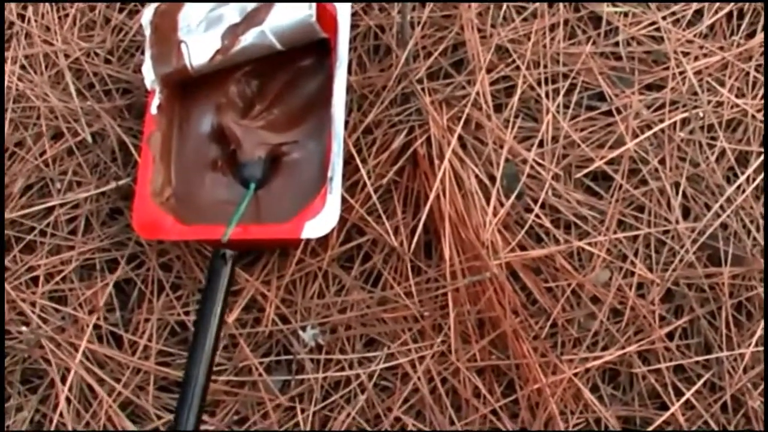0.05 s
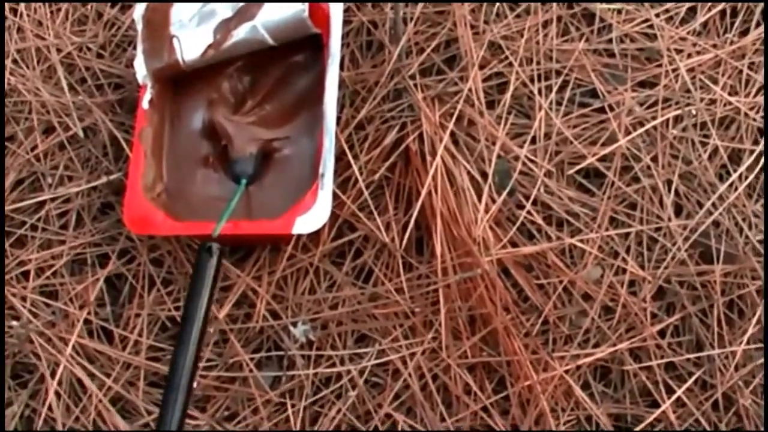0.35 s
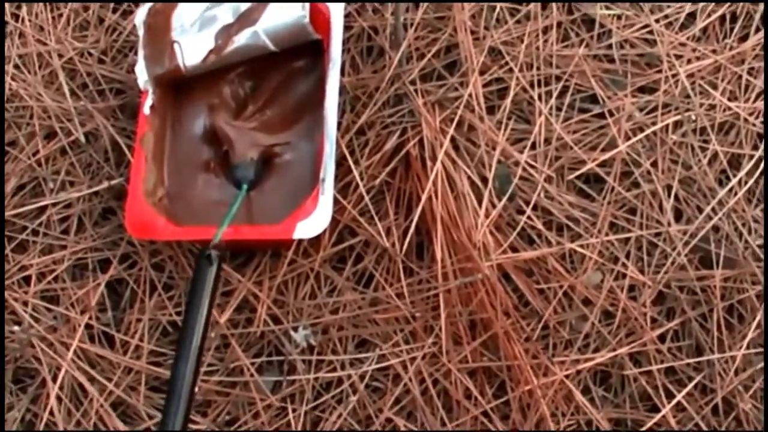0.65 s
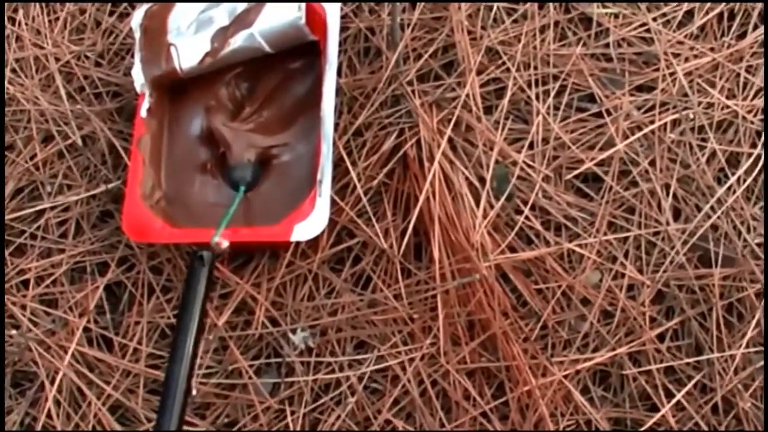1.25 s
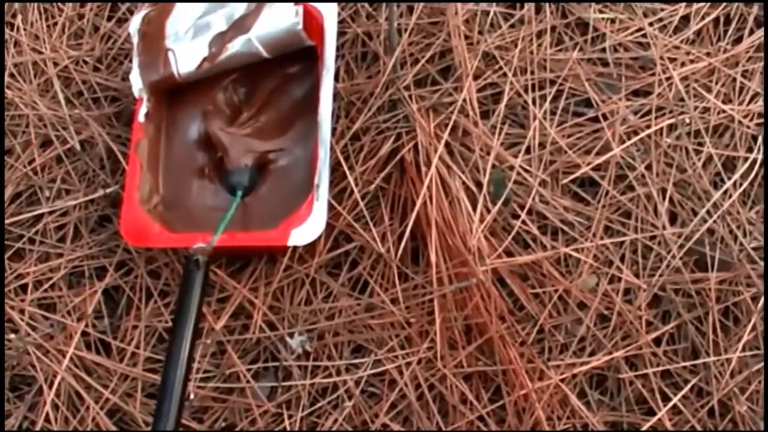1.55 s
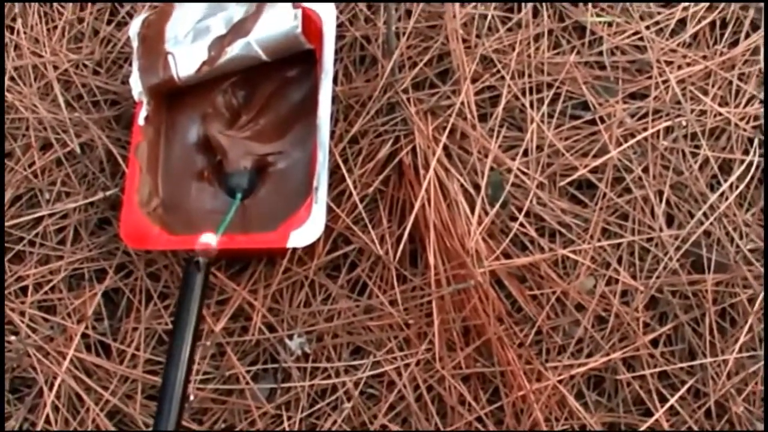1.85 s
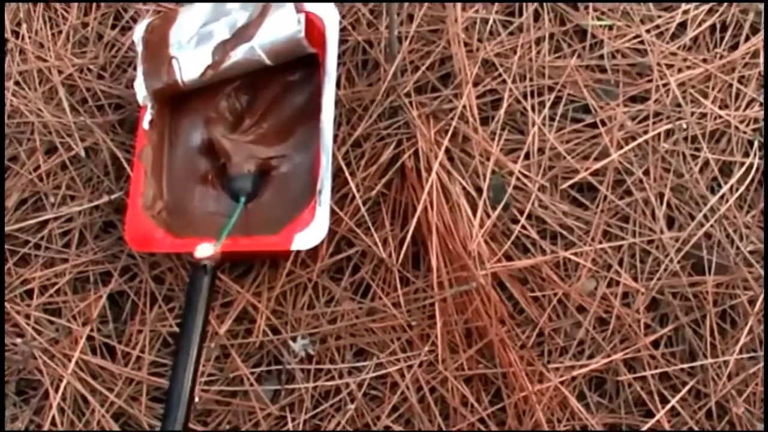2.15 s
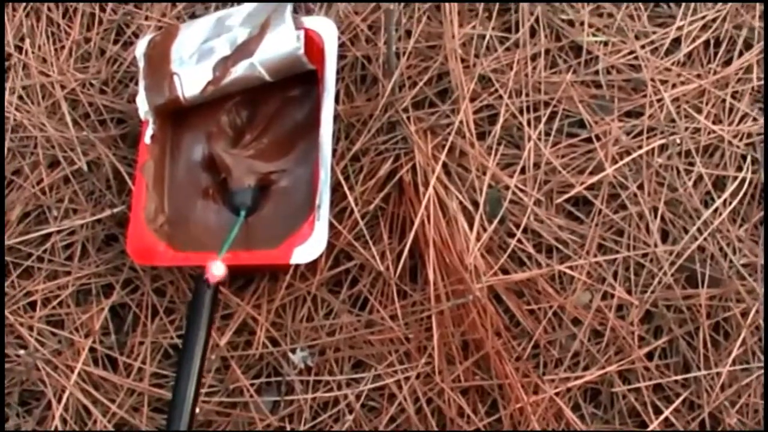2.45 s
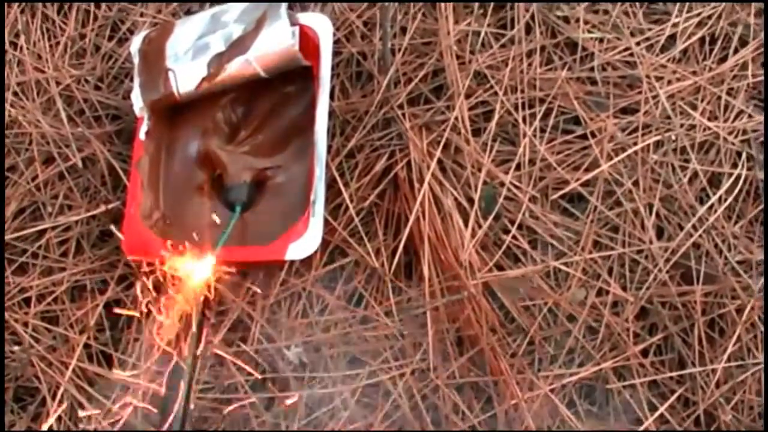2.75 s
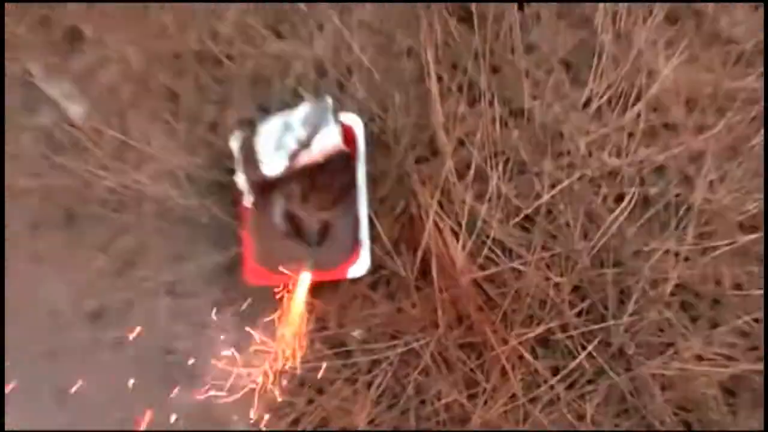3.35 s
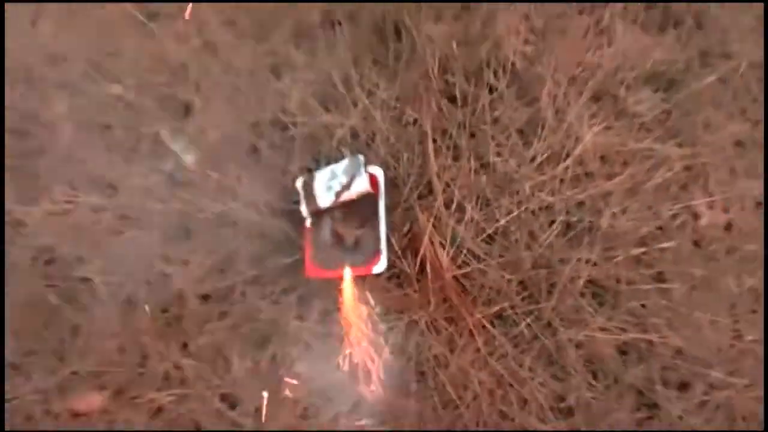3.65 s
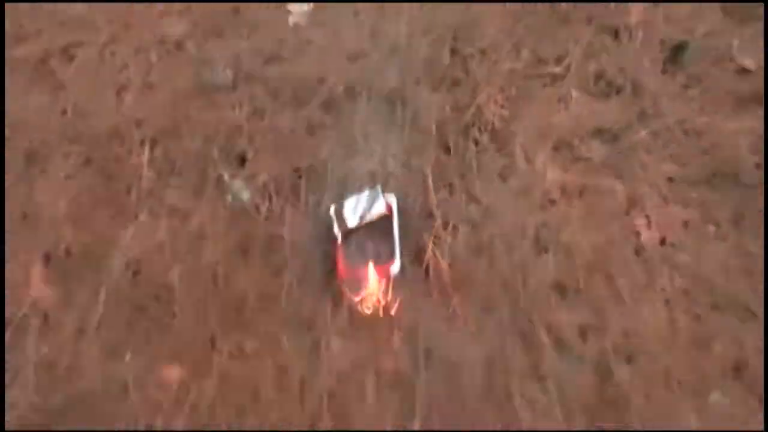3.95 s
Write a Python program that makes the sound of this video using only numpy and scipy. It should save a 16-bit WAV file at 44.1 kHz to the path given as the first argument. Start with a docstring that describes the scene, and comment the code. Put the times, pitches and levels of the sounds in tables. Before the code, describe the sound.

A firecracker fuse is lit outdoors over a low rumble. A lighter clicks three times in the first 0.7 seconds, the second click softer. Faint powder spits follow from 0.9 seconds, growing denser. At 2.7 seconds the fuse flares into a bright, crackling hiss, with a few sharp pops near 2.9. The hiss gradually weakens as the microphone backs away, and wind buffets it lightly near 4 seconds.

```python
"""Outdoors, on the ground: a long gas lighter is clicked three times and held to a firecracker fuse.
Each snap of the igniter's hammer knocks the case and rings a spring. Powder grains spit in the flame;
the fuse flares, then burns as a hissing gas jet full of sparks, fading as the microphone backs away.
Air buffets the moving microphone. A low rumble and a wash of open air lie under everything."""
import sys
import numpy as np
from scipy import signal
from scipy.fft import rfft, irfft
from scipy.io import wavfile
from scipy.ndimage import map_coordinates

SR = 44100
rng = np.random.default_rng(int(sys.argv[2]) if len(sys.argv) > 2 else 0)


def wav_out(sig):
    """Save sig, one row per channel (or a flat mono array), as 16-bit PCM at SR to the path in sys.argv[1]."""
    wavfile.write(sys.argv[1], SR, np.round(np.clip(np.atleast_2d(sig).T, -1, 1) * 32767).astype(np.int16))


N = 176400  # 4 s

# burn strength (time [s], level [dB])
JET_LEVEL = [(2.66, -70), (2.70, -37.5), (2.77, -31), (2.82, -29.5), (2.89, -28.5), (3.04, -29),
             (3.09, -29), (3.204, -28.5), (3.218, -31.5), (3.29, -31.3), (3.41, -33), (3.46, -31.5),
             (3.495, -35.3), (3.70, -36), (3.79, -38.5), (3.84, -35.5), (3.92, -39), (4.0, -38.5)]
# larger sparks (time [s], level [dB], t60 [s])
SPARK_POPS = [(2.8915, -27, .006), (2.9445, -22, .008), (2.9575, -16, .006)]
# single powder grains (time [s], level re SPIT_DB [dB], t60 [s])
GRAIN_SPITS = [(0.8824, -29.5, 0.0025), (1.2115, -47, 0.026), (1.2873, -48.5, 0.0058), (1.5135, -42, .02),
               (1.5232, -40.5, 0.0097), (1.5788, -59, .004), (1.8635, -38.5, 0.048), (1.8755, -39.5, 0.023),
               (1.8870, -40, 0.0076), (2.0077, -46.5, 0.011), (2.0308, -51, .006), (2.0442, -52, .006),
               (2.0655, -46.5, 0.0091), (2.1728, -40.5, 0.011), (2.2300, -48, .005), (2.3966, -37, 0.013),
               (2.4015, -35.5, 0.016), (2.4085, -36, 0.0074), (2.4591, -38, .006), (2.4679, -41, 0.0045),
               (2.5023, -42, 0.0093), (2.5136, -41.5, .01), (2.5277, -42, .01), (2.5515, -39.5, .014),
               (2.5620, -38, .01), (2.5718, -36, 0.0084), (2.5822, -33, 0.014), (2.5877, -39, 0.017),
               (2.6025, -34.5, .008), (2.6105, -39, 0.0093), (2.6355, -36, 0.017), (2.6572, -43, .008),
               (2.6688, -40, .01), (2.6743, -31.5, .008)]
# fuse spectra (frequency [Hz], relative level [dB])
JET_SPECTRUM = [(500, -12.5), (900, -10.5), (1500, -4.5), (1750, -7), (1880, -15.5), (2700, -6.5),
                (3500, -2), (4700, 3.5), (5650, -4), (6400, -3), (7500, 1.5), (9600, -3.5), (11200, 0.5),
                (12500, -1), (15300, 1.5), (16000, -4)]
ROAR_SPECTRUM = [(30, -26), (150, -16), (220, -2.5), (290, 2.5), (400, -7), (580, -15), (850, -10.5),
                 (1500, -18.5), (2000, -22), (5000, -67)]
FLARE_SPECTRUM = [(300, -6), (1400, -1.5), (2000, -9.5), (2800, -1.5), (3500, 5), (4600, 1), (5400, -9),
                  (7100, 0), (8200, -8), (10000, -16), (11900, 3.5), (13500, -2.5), (15000, -1),
                  (16000, -19)]
SPIT_SPECTRUM = [(500, -31), (2000, -16.5), (3500, -0.5), (5000, -5.5), (7500, -0.5), (9700, -8),
                 (12500, 1), (16000, -1.5)]

# lighter mechanism (time [s], relative level [dB], contact offset [dB], case t60 [s])
LIGHTER_CLICKS = [(0.1357, -26.5, -1, 0.0052), (0.1515, -12.5, -4.5, .011), (0.3665, -44, -11, 0.0051),
                  (0.3970, -48, -7, .006), (0.4166, -37, -7, 0.024), (0.4348, -22, 8, .011),
                  (0.5352, -39, -8, 0.01), (0.5797, -42, -19, 0.015), (0.6020, -46.5, -18, .015),
                  (0.6920, -13.5, 0, 0.014)]
# hammer blows (time [s], thump [dB], knock [dB], spring [dB], spring [Hz], low mode re spring [dB])
HAMMER_SNAPS = [(0.1530, -23.5, -23, -50, 6051, -22), (0.4344, -42, -34, -54, 6300, 1),
                (0.6925, -25, -16.5, -45, 6051, -22)]
# lighter case and hard contact (frequency [Hz], relative level [dB])
CASE_SPECTRUM = [(60, -35), (300, -7), (700, -19), (1150, -27), (1700, -14), (3000, -13.5), (3500, -2.5),
                 (4200, -3.5), (4900, -9), (6500, -12.5), (8200, -12.5), (9500, -21), (16000, -13)]
CONTACT_SPECTRUM = [(2000, -52), (6000, -7.5), (9600, -10), (11000, 0), (13300, -1), (14500, 4),
                    (16000, -5.5)]

# reflections off the ground and a tub (delay [ms], gain [linear])
ECHO_PATHS = [(.51, 0.063), (.80, 0.089), (2.4, 0.1), (5.3, 0.11)]
# background envelopes (time [s], level [dB])
BUFFET_LEVEL = [(3.0, -100), (3.3, -73.5), (3.6, -60), (3.90, -43), (3.93, -44), (3.96, -50), (4, -39)]
RUMBLE_LEVEL = [(0, -42.5), (1.2, -40), (2.4, -38.5), (4, -38)]
AIR_LEVEL = [(0, -52.5), (1.2, -53), (2.4, -48.5), (4, -45.5)]
# background spectra (frequency [Hz], relative level [dB])
BUFFET_SPECTRUM = [(25, -3), (60, 4), (135, 9), (200, -8.5), (400, -12), (1500, -32), (5000, -69)]
RUMBLE_SPECTRUM = [(20, -44), (42, -36), (54, -14.5), (70, 0.5), (110, 0.5), (138, -13), (160, -32.5),
                   (300, -64.5)]
AIR_SPECTRUM = [(100, -14.5), (163, -6), (190, -1.5), (260, 1), (420, -3.5), (600, -12.5), (1050, -11.5),
                (1550, -17.5), (2000, -29.5), (3000, -28), (4300, -26.5), (5800, -34), (9700, -38),
                (14000, -38), (16000, -62)]
# stereo width of near and distant sound (frequency [Hz], side re mid [dB])
NEAR_SIDE = [(100, -18), (300, -38), (600, -34), (1200, -36.5), (2200, -73), (4500, -15), (9000, -14),
             (14000, -11)]
FAR_SIDE = [(45, -8), (90, -43.5), (160, -10.5), (300, -15), (600, -12), (1200, -5.5), (2400, -6),
            (5000, -2.5), (14000, -2.5)]

CATCH_S, CATCH_RISE_S = 2.694, 0.0069
SPIT_DB, SNAP_RISE_S = -4, 0.00017


def burning_fuse():
    """Burning powder drives a fluttering gas jet: hiss, sparks and a turbulent low roar."""
    jet_db = in_time(JET_LEVEL)
    sparks = from_db(-11) * spark_crackle()
    hiss_db = jet_db + 0.81 * drift(rate_hz=50)
    hiss = from_db(hiss_db) * jet_timbre(noise(JET_SPECTRUM) + sparks, jet_db)
    roar_db = -27.5 + 0.52 * jet_db + 1.5 * drift(rate_hz=22)
    roar = from_db(roar_db) * noise(ROAR_SPECTRUM)
    return ignition() * (hiss + roar) + bursts(SPARK_POPS, SPIT_SPECTRUM, SNAP_RISE_S)


def spark_crackle(rate_per_s=760, spread_db=3.5):
    """Fine sparks: random impulses, mostly small."""
    size_db = spread_db * np.minimum(rng.exponential(1, N), 5)
    impulses = from_db(size_db) * rng.choice([-1, 1], N)
    fired = rng.random(N) < rate_per_s / SR
    return colour(unit_rms(impulses * fired), JET_SPECTRUM)


def jet_timbre(x, jet_db, depth_db=1.5, width_hz=180, rate_hz=1.5, knee_hz=5030, ref_db=-31.5):
    """Resonances shift as the burning tip changes shape; a stronger jet is brighter."""
    hz, frame_s, frames = signal.stft(x, SR, nperseg=1024)
    field = rng.standard_normal((len(hz) + 100, len(frame_s) + 200))  # padded for filter settling
    field = smooth(field, pole=np.exp(-hz[1] / width_hz), axis=0)
    field = smooth(field, pole=np.exp(-2 * np.pi * rate_hz * frame_s[1]), axis=1)
    peaks_db = depth_db * unit_rms(field[-len(hz):, -len(frame_s):])
    treble_oct = np.log2(np.maximum(hz / knee_hz, 1))
    excess_db = np.interp(frame_s, seconds(), jet_db) - ref_db
    tilt_db = 0.27 * np.outer(treble_oct, excess_db)
    return signal.istft(frames * from_db(peaks_db + tilt_db), SR)[1][:, :N]


def ignition():
    """Gain rising from 0 to 1 as the powder catches."""
    return np.exp(np.minimum(seconds() - CATCH_S, 0) / CATCH_RISE_S)


def flare(peak_s=2.744, swell_s=0.027, fall_s=0.026):
    """The tip goes up in a hiss and a swelling puff; both then collapse."""
    age_s = seconds() - peak_s
    swell = np.exp(np.minimum(age_s, 0) / swell_s)
    fall = np.exp(-np.maximum(age_s, 0) / fall_s)
    hiss = from_db(-31.5) * noise(FLARE_SPECTRUM)
    puff = from_db(-30) * swell * noise(ROAR_SPECTRUM)
    return ignition() * fall * (hiss + puff)


def spitting(top_rate_per_s=130, build_s=0.17, sizzle_rel_db=-55, sizzle_t60_s=0.0066):
    """Grains go off as the fuse heats; a faint sizzle thickens until the powder catches."""
    t = seconds()
    rate_per_s = top_rate_per_s * np.exp(np.minimum(t - CATCH_S, 0) / build_s) * (t < CATCH_S)
    sizzle = [(s, sizzle_rel_db, sizzle_t60_s) for s in t[rng.random(N) < rate_per_s / SR]]
    return from_db(SPIT_DB) * bursts(list(GRAIN_SPITS) + sizzle, SPIT_SPECTRUM, rise_s=0.00069)


def lighter(case_db=-5.5, contact_db=-4.5, rattle_t60_s=0.042):
    """Hard contacts rattle the case; the hammer adds a thump, a knock, spring ring and bright rattle."""
    case = [(s, db + case_db, t60_s) for s, db, _, t60_s in LIGHTER_CLICKS]
    contacts = [(s, db + contact_db + offset_db, 0.79 * t60_s)
                for s, db, offset_db, t60_s in LIGHTER_CLICKS]
    out = bursts(case, CASE_SPECTRUM, SNAP_RISE_S) + bursts(contacts, CONTACT_SPECTRUM, SNAP_RISE_S)
    rattles = []
    for s, thump_db, knock_db, spring_db, spring_hz, low_mode_db in HAMMER_SNAPS:
        out += ring(s, thump_db, hz=273, t60_s=0.016)
        out += ring(s, knock_db, hz=3930, t60_s=0.0083)
        out += ring(s, spring_db, hz=spring_hz, t60_s=0.2)
        out += ring(s, spring_db + low_mode_db, hz=4576, t60_s=0.2)
        rattles.append((s, spring_db + 2, rattle_t60_s))
    return out + bursts(rattles, CONTACT_SPECTRUM, SNAP_RISE_S)


def with_echoes(x):
    """Short reflections comb the sound; their paths drift as the microphone moves."""
    out, t = x.copy(), seconds()
    for delay_ms, gain in ECHO_PATHS:
        delay_s = delay_ms / 1000 * (1 + 0.031 * drift(rate_hz=0.43))
        out += gain * np.array([map_coordinates(channel, [(t - delay_s) * SR]) for channel in x])
    return out


def background():
    """Air buffeting each microphone port separately, distant rumble, open-air wash."""
    buffet = from_db(in_time(BUFFET_LEVEL)) * colour(rng.standard_normal((2, N)), BUFFET_SPECTRUM)
    rumble = from_db(in_time(RUMBLE_LEVEL)) * noise(RUMBLE_SPECTRUM, FAR_SIDE)
    air = from_db(in_time(AIR_LEVEL)) * noise(AIR_SPECTRUM, FAR_SIDE)
    return buffet + rumble + air


def bursts(rows, spectrum, rise_s):
    """Fast-decaying stereo noise puffs from (time [s], level [dB], t60 [s])."""
    out, age_s = np.zeros((2, N)), np.arange(SR // 10) / SR
    for onset_s, db, t60_s in rows:
        envelope = from_db(-60 * age_s / t60_s) * (1 - np.exp(-age_s / rise_s))
        envelope /= envelope.max()
        puff = unit_rms(rng.uniform(-0.95, 1, (2, len(age_s))) * envelope)
        puff *= np.sqrt(np.mean(envelope ** 2))
        start = int(onset_s * SR)
        out[:, start:start + len(age_s)] += from_db(db) * puff
    return colour(stereo(*out, NEAR_SIDE), spectrum)


def ring(onset_s, db, hz, t60_s):
    """One struck mode."""
    age_s = np.maximum(seconds() - onset_s, 0)
    return from_db(db - 60 * age_s / t60_s) * np.sin(2 * np.pi * hz * age_s)


def noise(spectrum, width=NEAR_SIDE):
    """Coloured stereo noise, roughly unit power."""
    return colour(stereo(*rng.standard_normal((2, N)), width), spectrum)


def stereo(mid, side, width):
    """Mid/side to left/right, side filtered by width."""
    side = irfft(rfft(side, 2 * N) * bin_gains(width))[:N]
    return np.array([mid + side, mid - side])


def colour(x, spectrum):
    """Minimum-phase filter; white noise keeps its power."""
    cepstrum = irfft(np.log(unit_rms(bin_gains(spectrum))))
    cepstrum[1:N] *= 2
    cepstrum[N + 1:] = 0
    return irfft(rfft(x, 2 * N) * np.exp(rfft(cepstrum)))[..., :N]


def bin_gains(spectrum):
    """Gain per FFT bin from (frequency [Hz], level [dB])."""
    hz, db = np.transpose(spectrum)
    bin_hz = np.arange(N + 1) * SR / (2 * N)
    return from_db(np.interp(np.log(bin_hz + 1), np.log(hz), db))


def drift(rate_hz):
    """Random wander, unit RMS."""
    pole = np.exp(-2 * np.pi * rate_hz / SR)
    return unit_rms(smooth(rng.standard_normal(N + SR), pole)[SR:])


def smooth(x, pole, axis=-1):
    """Double-pole low-pass, unnormalised."""
    return signal.lfilter([1], [1, -2 * pole, pole * pole], x, axis=axis)


def in_time(rows):
    """Linear interpolation of (time [s], level [dB])."""
    return np.interp(seconds(), *np.transpose(rows))


def seconds():
    """Sample times."""
    return np.arange(N) / SR


def from_db(db):
    """Decibels to gain."""
    return 10 ** (np.asarray(db) / 20)


def unit_rms(x):
    """Scale to unit power."""
    return x / np.sqrt(np.mean(x ** 2) + 1e-20)


def scene(pan_db=0.3):
    """Lighter and fuse just left of centre, over the background."""
    near = lighter() + with_echoes(spitting() + flare() + burning_fuse())
    return near * from_db([[pan_db], [-pan_db]]) + background()


def record(dry, cutoff_hz=15850):
    """Steep low-pass."""
    taps = signal.firwin(255, cutoff_hz, fs=SR, window="blackman")
    return signal.fftconvolve(dry, taps[None], mode="same")


dry = scene()
out = record(dry)
wav_out(out)
```